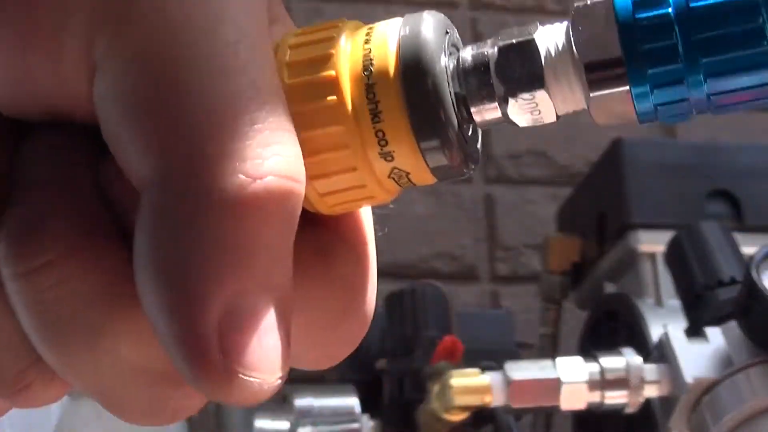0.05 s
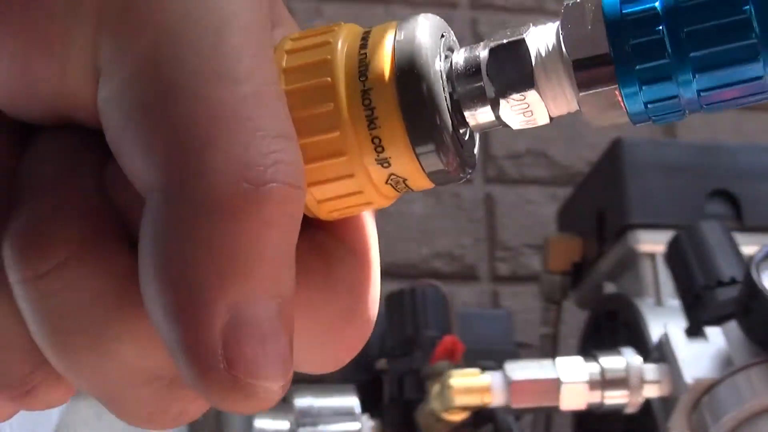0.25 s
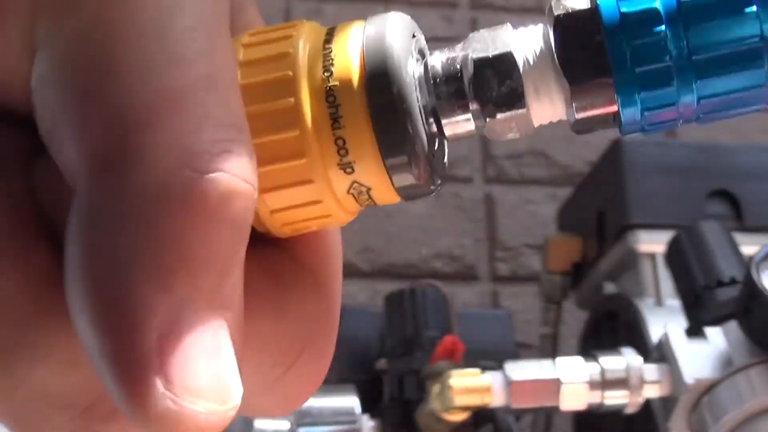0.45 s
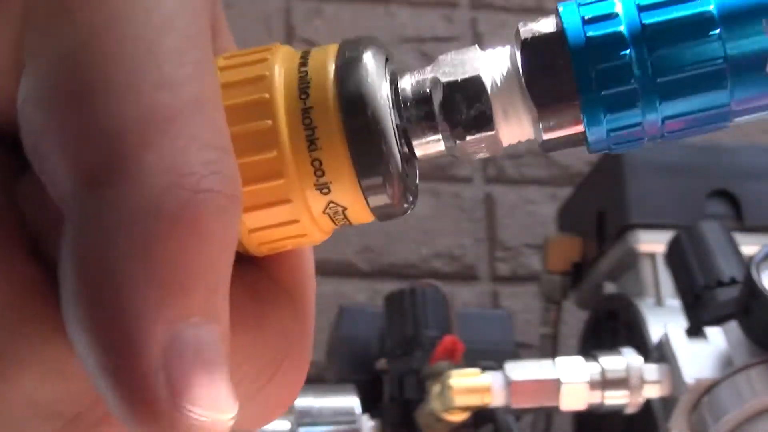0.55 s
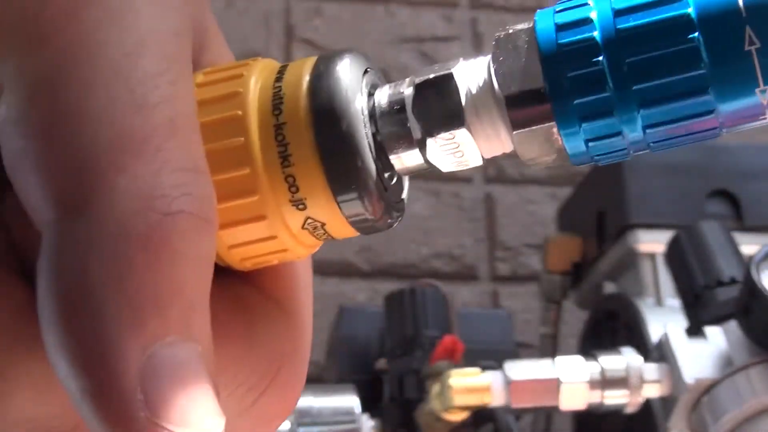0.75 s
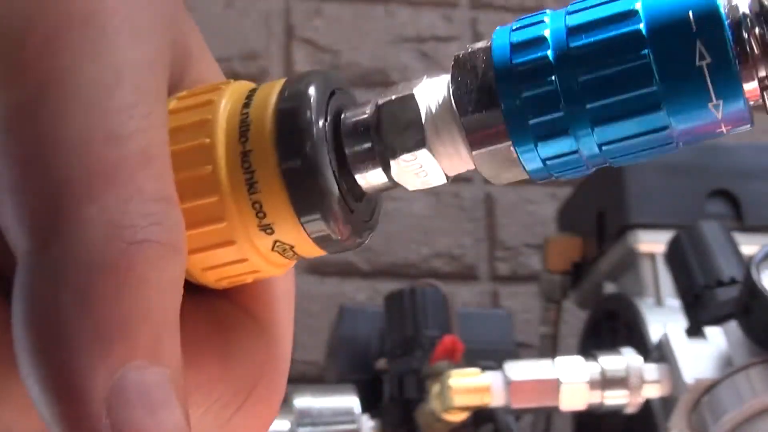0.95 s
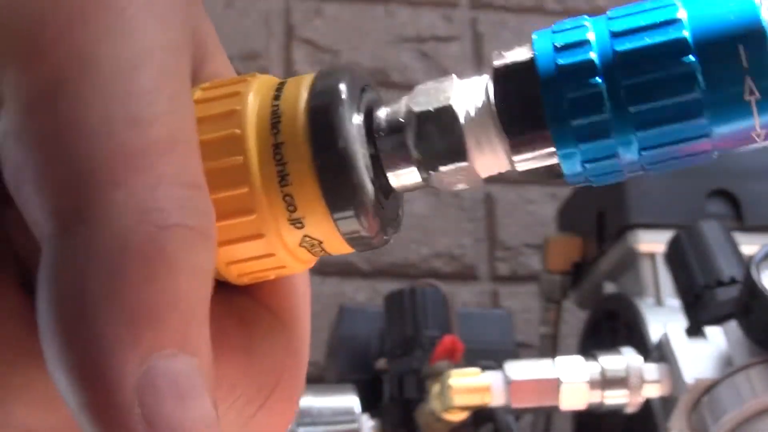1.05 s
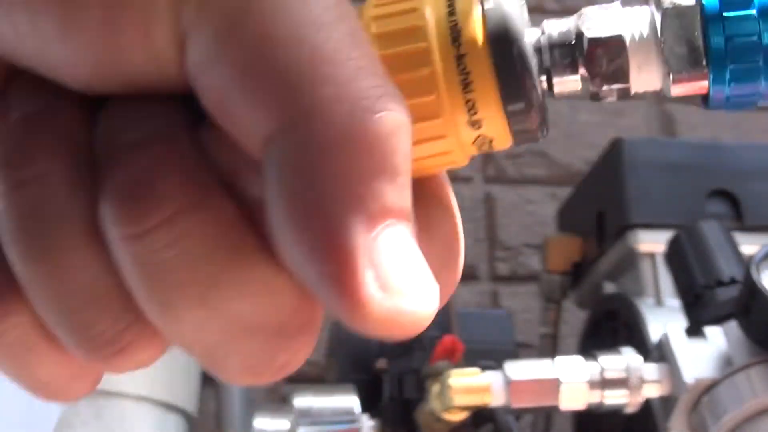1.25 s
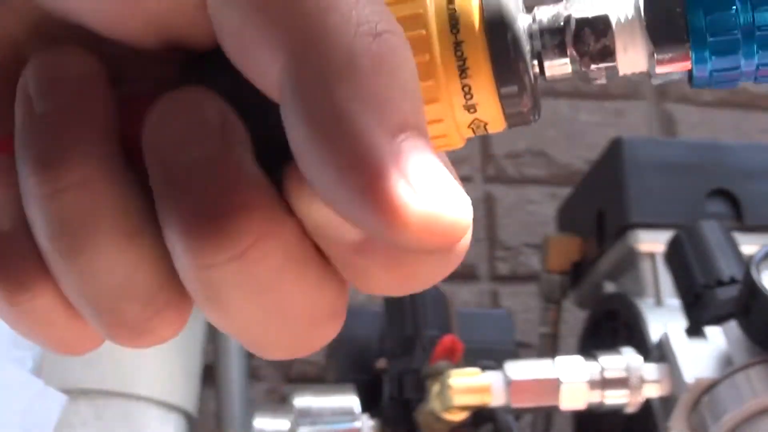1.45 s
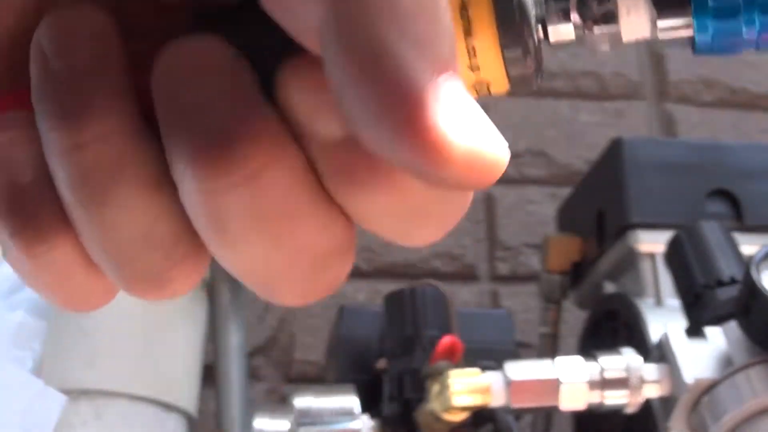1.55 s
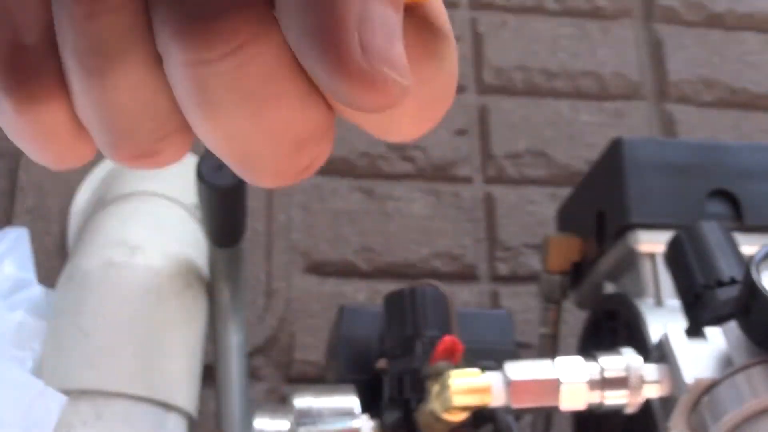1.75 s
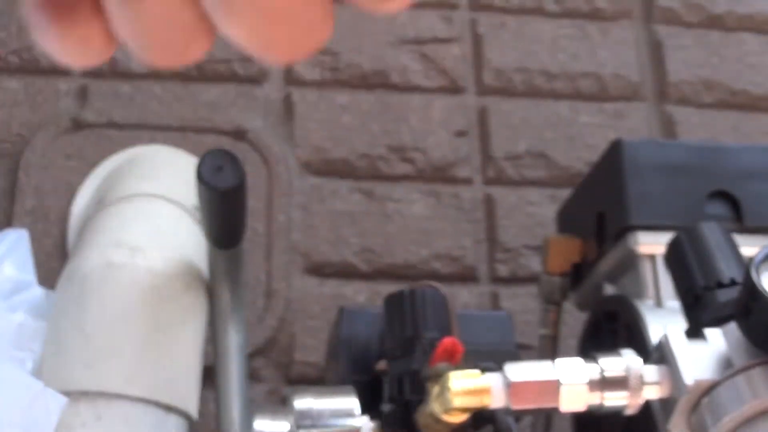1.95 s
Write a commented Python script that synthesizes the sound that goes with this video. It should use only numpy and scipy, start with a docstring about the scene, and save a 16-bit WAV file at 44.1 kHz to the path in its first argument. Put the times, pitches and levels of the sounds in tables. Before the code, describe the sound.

Compressed air hisses from a hose coupler close by, outdoors. After faint ticks over low rumble, the valve opens at about 0.2 seconds and the loud, bright hiss blows with a slight flutter. Near 1.2 seconds it cuts off with a soft thud and a faint metallic ring. From about 1.4 seconds, quiet ticks, finger rubbing and a distant motor's drone gradually come up.

```python
"""Over outdoor rumble and a distant motor, a hand rubs and ticks on an air coupler; its seal seeps.
At 0.22 s the valve knocks open and compressed air hisses through the fitting's cavities, close by.
Hand, fittings and a brick wall throw the hiss back; gain control ducks everything while it blows.
At 1.175 s the valve snaps shut and the metal rings. Ticks, rubbing and the motor's drone follow
as the gain recovers."""
import sys
import numpy as np
from scipy import signal
from scipy.fft import rfft, irfft
from scipy.io import wavfile
from scipy.ndimage import uniform_filter1d

SR = 44100
rng = np.random.default_rng(int(sys.argv[2]) if len(sys.argv) > 2 else 0)


def transcribe(signal):
    """Save signal, clipped to [-1, 1], as a 16-bit WAV file at the path in sys.argv[1]."""
    frames = np.atleast_2d(signal).T
    limited = np.clip(frames, -1, 1)
    pcm = np.round(limited * 32767).astype(np.int16)
    wavfile.write(sys.argv[1], SR, pcm)


N = 88200
T, HZ = np.arange(N) / SR, np.fft.rfftfreq(N, 1 / SR)
OPEN_S, SHUT_S = 0.216, 1.175

# Balance of rumble and rubbing: freq_hz, left_minus_right_db
AMBIENT_BALANCE = [(60, -5), (200, -10.5), (500, -16.5), (1200, -18.5), (4000, -11.5), (15000, -5.5)]
# Their left-right likeness: freq_hz, coherence
AMBIENT_COHERENCE = [(25, 0.0081), (70, 1), (170, 0.87), (380, 0.02), (1000, 0), (15000, 0.31)]


def amp(db):
    """Decibels to gain."""
    return 10 ** (np.asarray(db) / 20)


def unit(x):
    """Scales to rms 1."""
    return x / np.sqrt(np.mean(x ** 2) + 1e-20)


def over_freq(points, hz=HZ):
    """Interpolates a table over log frequency."""
    freq_hz, value = np.transpose(points)
    return np.interp(np.log(hz + 1), np.log(freq_hz), value)


def over_time(points):
    """Interpolates a table over time."""
    return np.interp(T, *np.transpose(points))


def resonance(hz, width_hz):
    """Bell-shaped spectral peak of height 1."""
    return 1 / (1 + (2 * (HZ - hz) / width_hz) ** 2)


def noise(magnitude):
    """Spectrally shaped noise, rms 1."""
    return unit(irfft(rfft(rng.standard_normal(N)) * magnitude, N))


def wander(rate_hz):
    """Slow random motion, rms 1."""
    return noise(np.exp(-(HZ / rate_hz) ** 2) * (HZ > 2))


def stereo_noise(spectrum_db, balance, coherence, lead_rad=0):
    """Partly coherent left and right noise, rms 1."""
    common, separate = rfft(rng.standard_normal((2, N)))
    likeness = np.clip(over_freq(coherence), -1, 1)
    tilt = amp(over_freq(balance))
    left = tilt * np.exp(1j * lead_rad) * (likeness * common + np.sqrt(1 - likeness ** 2) * separate)
    spectra = np.array([left, common]) / np.sqrt(1 + tilt ** 2)
    return unit(irfft(spectra * amp(spectrum_db), N))


def gate(start_s, end_s, fade_s):
    """Fades in, holds, fades out."""
    return np.clip(np.minimum(T - start_s, end_s - T) / fade_s, 0, 1)


def burst(start_s, decay_s, rise_s):
    """Linear rise, exponential fall."""
    age_s = np.maximum(T - start_s, 0)
    return np.minimum(age_s / rise_s, 1) * np.exp(-age_s / decay_s)


def outdoor_rumble():
    """Low background noise, stronger on the right."""
    # freq_hz, density_db
    spectrum = [(25, -17.5), (55, -4.5), (120, -4), (210, -2.5), (280, -13.5), (380, -8), (480, -16.5),
                (800, -22), (1200, -20.5), (2000, -31), (3800, -33.5), (5000, -38.5), (8000, -42.5),
                (15000, -53.5)]
    # time_s, level_db
    level = [(0, -35), (.1, -36), (.25, -34.5), (1.2, -34), (1.5, -37.5), (2, -42)]
    return stereo_noise(over_freq(spectrum), AMBIENT_BALANCE, AMBIENT_COHERENCE) * amp(over_time(level))


def motor_drone(left_db=-14.5):
    """A distant motor's wavering tones come and go."""
    # start_s, end_s, pitch_hz, level_db, waver_ratio
    tones = [(-.2, .4, 140, -34.5, 0.012), (1.3, 1.824, 172, -32, 0.0051), (1.63, 2.2, 167, -39.5, 0.0082),
             (1.793, 2.2, 202, -36.5, 0.012), (1.5, 2.2, 369, -45, 0.037)]
    drone = np.zeros(N)
    for start_s, end_s, pitch_hz, level_db, waver in tones:
        phase = 2 * np.pi * np.cumsum(pitch_hz * (1 + waver * wander(rate_hz=29))) / SR
        drone += gate(start_s, end_s, fade_s=0.14) * amp(level_db) * unit(np.sin(phase))
    return drone * amp([[left_db], [0]])


def skin_rubs():
    """Friction noise of skin sliding on the sleeve."""
    # freq_hz, density_db
    spectrum = [(500, -25), (2000, -25), (4000, 4.5), (9000, 3), (15000, -1)]
    # start_s, end_s, level_db, dullness_db_per_octave
    strokes = [(-.1, 0.197, -70, 19), (1.637, 2.2, -58.5, 0)]
    rubs = np.zeros((2, N))
    for start_s, end_s, level_db, dullness in strokes:
        colour_db = over_freq(spectrum) - dullness * np.log2(1 + HZ / 1000)
        friction = stereo_noise(colour_db, AMBIENT_BALANCE, AMBIENT_COHERENCE)
        rubs += amp(level_db) * gate(start_s, end_s, fade_s=0.15) * friction
    return rubs


def seal_seep(level_db=-60.5):
    """Air whistles thinly at the seal until the valve opens."""
    return amp(level_db) * noise(resonance(5620, width_hz=27)) * (T < OPEN_S)


def sleeve_ticks():
    """Handling ticks and scuffs: one resonance each, plus the sleeve's dull body."""
    # start_s, level_db, decay_s, resonance_hz, body_db
    contacts = [(0.027, -51, 0.023, 6850, -5), (0.196, -41.5, 0.0052, 6400, 4.5),
                (1.44, -53, 0.029, 7700, -12), (1.645, -49.5, .006, 10600, 2),
                (1.687, -50.5, 0.0061, 10700, 9.5), (1.722, -54.5, 0.011, 4020, 4.5)]
    # freq_hz, density_db
    body_spectrum = [(300, -14), (1200, 4), (2400, -3), (4200, 0), (8000, -9), (15000, -28)]
    ticks = np.zeros(N)
    for start_s, level_db, decay_s, resonance_hz, body_db in contacts:
        ring = noise(resonance(resonance_hz, width_hz=770))
        body = amp(body_db) * noise(amp(over_freq(body_spectrum)))
        ticks += amp(level_db) * burst(start_s, decay_s, rise_s=0.0017) * (ring + body)
    return ticks


def valve_knocks():
    """The valve thuds on opening and on closing."""
    # start_s, level_db, decay_s
    knocks = [(0.212, -29, 0.015), (1.171, -19.5, 0.032)]
    envelope = sum(amp(db) * burst(start_s, decay_s, rise_s=0.0045) for start_s, db, decay_s in knocks)
    return envelope * noise(resonance(113, width_hz=260))


def air_jet(crack_s=0.006, closing_db=-55.5, closing_s=0.051, body_hz=2460):
    """Turbulent air coloured by the coupler's cavities; its lower part gusts more than its top."""
    # freq_hz, density_db
    spectrum = [(40, -31.5), (150, -20.5), (350, -16.5), (500, -20.5), (800, -13), (1250, -15), (2100, -11),
                (2600, -7.5), (3700, -4.5), (4900, -3), (5400, 0), (7500, -0.5), (9000, -1), (11000, -0.8),
                (13000, 0.3), (15000, -3.5)]
    # centre_hz, width_hz, lift_db
    cavities = [(1666, 330, 6), (3850, 360, 2), (5290, 110, 2.5), (5570, 140, 1.5), (5794, 77, 5.5),
                (6200, 90, 1), (6420, 45, 5), (6870, 170, 4), (7050, 160, 5.5), (7530, 55, 7),
                (8750, 45, 4), (10060, 150, 3), (10600, 90, 1.5), (11600, 160, 4), (11900, 50, 2.5),
                (12460, 160, -0.5), (13080, 300, 4.5), (13780, 120, 5.5)]
    # freq_hz, left_minus_right_db
    balance = [(100, 7), (400, -1), (800, -10), (1300, -5.5), (1750, -10.5), (2300, -0.5), (3500, -0.6),
               (4700, -3), (5400, -7), (5900, -4.5), (7000, -7), (7800, -5), (11250, -3.5), (11600, -17),
               (13200, -18), (15000, -9)]
    # freq_hz, coherence
    coherence = [(100, .5), (500, .75), (1700, .78), (2800, 1), (4300, 0.94), (6400, .66), (10000, 0.56),
                 (12500, 0.5), (15000, 0.98)]
    # Earlier arrival on the left: freq_hz, lead_rad
    lead = [(1000, 0), (2800, 0), (5000, .1), (6400, .7), (8400, .6), (10500, 1.3), (11700, 0.022),
            (15000, 0)]
    # Lower part against the top: time_s, gain_db
    gusts = [(.25, 5.5), (.3, -4), (.34, 3), (.375, -5), (.42, 0), (.455, -3), (.505, -3.5), (.53, 3),
             (.64, 0.5), (.7, 1.5), (.88, -1), (1, 0), (1.06, 3), (1.16, -4.5)]
    # Valve opening, then shifting hand pressure: time_s, level_db
    flow = [(.222, -28), (.238, -22.5), (.256, -9.5), (.29, 1), (.52, 2), (.8, -0.5), (1.17, -2)]
    colour_db = over_freq(spectrum) + sum(db * resonance(hz, width_hz) for hz, width_hz, db in cavities)
    hiss = shift_colour(stereo_noise(colour_db, balance, coherence, over_freq(lead)))
    body = irfft(rfft(hiss) / (1 + (HZ / body_hz) ** 4), N)
    gust_db = over_time(gusts) + wander(rate_hz=38)
    hiss += body * (amp(gust_db) - 1)
    opening = np.clip((T - OPEN_S) / crack_s, 0, 1)
    flow_db = over_time(flow) + closing_db * np.maximum(T - SHUT_S, 0) / closing_s
    flutter_db = 0.62 * wander(rate_hz=70.5)
    return hiss * opening * amp(flow_db + flutter_db)


def shift_colour(hiss, depth_db=1.07, patch_s=0.05, patch_hz=111):
    """Narrow patches of the spectrum swell and fade as the hand moves."""
    hz, time_s, spectra = signal.stft(hiss, SR, nperseg=1024, noverlap=768)
    field = rng.standard_normal((len(time_s), len(hz)))
    for axis, step, size in ((0, time_s[1], patch_s), (1, hz[1], patch_hz)):
        offset = np.arange(-20, 21) * step
        blur = np.exp(-(2 * offset / size) ** 2)
        field = signal.fftconvolve(field, np.expand_dims(blur, 1 - axis), "same", axes=axis)
    spectra *= amp(depth_db * unit(field).T)
    return signal.istft(spectra, SR, nperseg=1024, noverlap=768)[1][:, :N]


def reflections(air, early_db=-13, tail_db=-19):
    """Near echoes off hand, fittings and wall, then a short tail whose treble dies first."""
    # freq_hz, t60_s
    decay = [(200, .35), (1500, 0.73), (4000, .42), (8000, 0.3), (15000, .24)]
    early = rng.standard_normal((2, N)) * burst(start_s=0.00033, decay_s=0.0045, rise_s=0.001)
    hz, time_s, spectra = signal.stft(rng.standard_normal((2, N)), SR, nperseg=256)
    spectra *= amp(-60 * time_s / over_freq(decay, hz)[:, None])
    tail = signal.istft(spectra, SR, nperseg=256)[1][:, :N] * np.minimum(T / 0.01, 1)
    response = (amp(early_db) * unit(early) + amp(tail_db) * unit(tail)) / np.sqrt(N)
    return signal.fftconvolve(air, response, axes=1)[:, :N]


def gap_spit(peak_s=0.2616, half_width_s=0.015, level_db=-15):
    """The half-open gap spits for a moment."""
    envelope = np.exp(-((T - peak_s) / half_width_s) ** 2)
    return amp(level_db) * envelope * noise(resonance(3625, width_hz=1100))


def fitting_ring(level_db=-41.5, left_db=-3):
    """The closing valve strikes the modes of the metal fittings."""
    # pitch_hz, relative_db, t60_s
    modes = [(1990, -10, 0.96), (2730, 1.5, 0.78), (3138, -3, 0.69), (3246, -5.5, .6), (3499, -4.5, 1.2),
             (3830, 1.5, 0.64), (4540, -5, .6), (5660, -6.5, .45), (7560, -7.5, .35)]
    age_s = np.maximum(T - SHUT_S, 0)
    ring = sum(amp(db - 60 * age_s / t60_s) * np.sin(2 * np.pi * hz * age_s) for hz, db, t60_s in modes)
    return amp(level_db) * ring * amp([[left_db], [0]])


def scene(handling_left_db=-8):
    """Stereo mix; only the escaping air is reflected."""
    background = outdoor_rumble() + motor_drone()
    handling = skin_rubs() + (seal_seep() + sleeve_ticks() + valve_knocks()) * amp([[handling_left_db], [0]])
    air = air_jet() + gap_spit()
    return background + handling + air + reflections(air) + fitting_ring()


def record(dry, threshold_db=-16, duck_db_per_db=0.86, recovery_db_per_s=20, cutoff_hz=15050):
    """Gain control holds the hiss down and recovers slowly; a steep low-pass follows."""
    power = uniform_filter1d((dry ** 2).mean(0), size=900)
    power_db = 10 * np.log10(abs(power) + 1e-12)
    recovery_db = T * recovery_db_per_s
    held_db = np.maximum.accumulate(power_db + recovery_db) - recovery_db
    excess_db = np.maximum(held_db - threshold_db, 0)
    ducked = dry / amp(duck_db_per_db * uniform_filter1d(excess_db, size=300))
    lowpass = signal.firwin(701, cutoff_hz, window=("kaiser", 9), fs=SR)
    return signal.oaconvolve(ducked, lowpass[None], "same")


dry = scene()
out = record(dry)
transcribe(out)
```